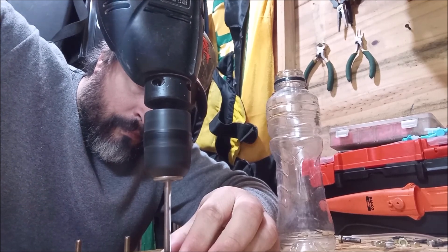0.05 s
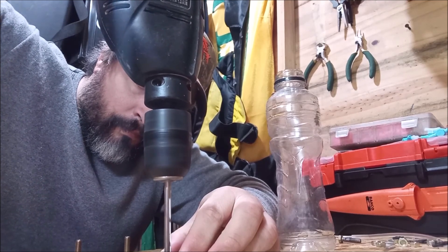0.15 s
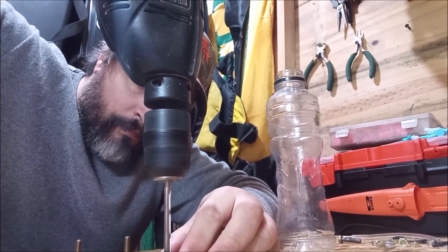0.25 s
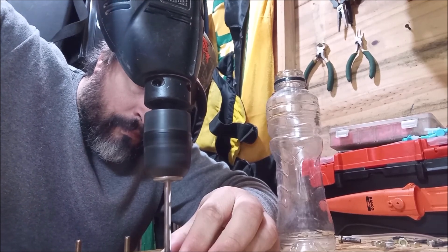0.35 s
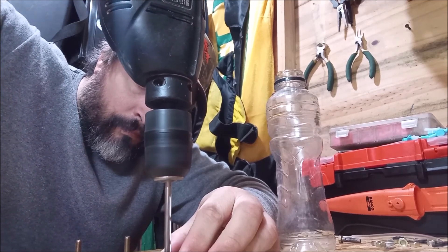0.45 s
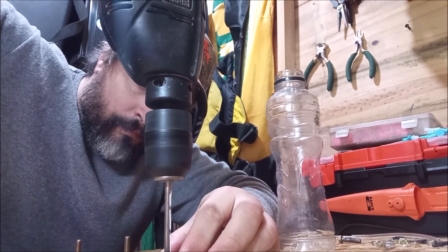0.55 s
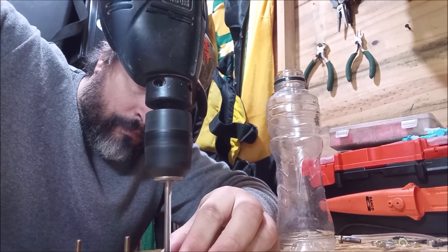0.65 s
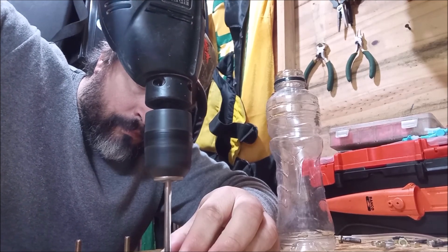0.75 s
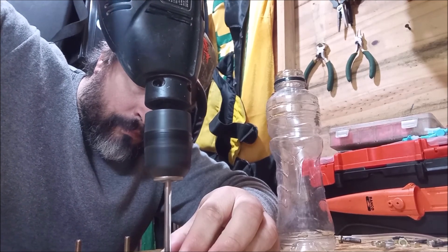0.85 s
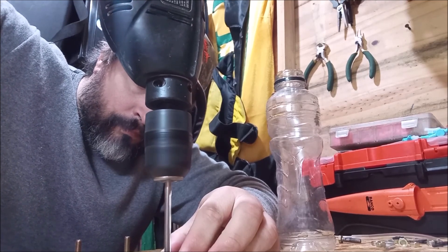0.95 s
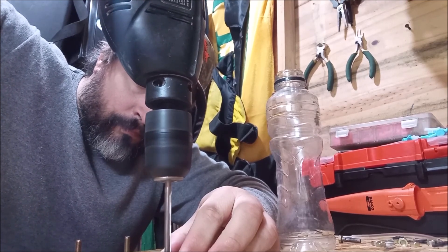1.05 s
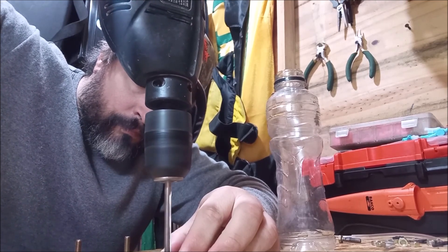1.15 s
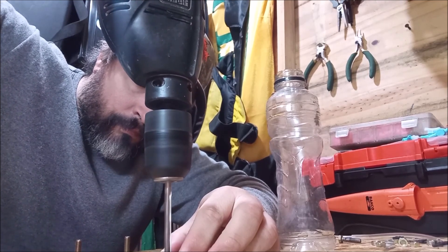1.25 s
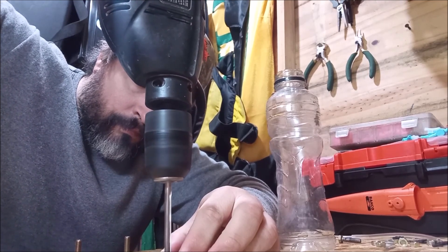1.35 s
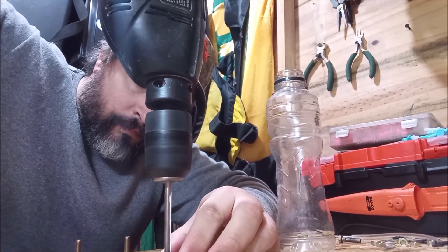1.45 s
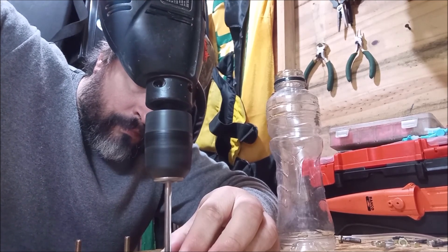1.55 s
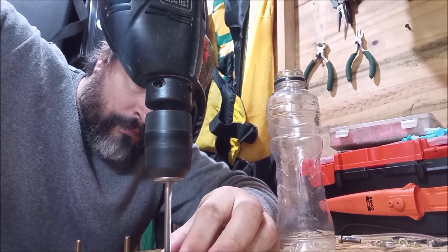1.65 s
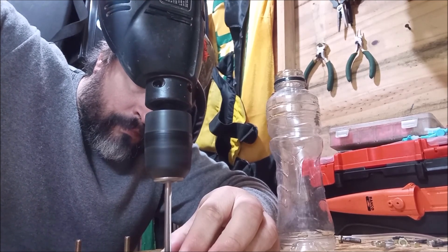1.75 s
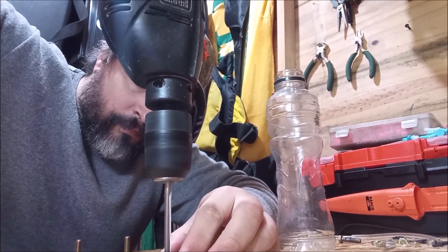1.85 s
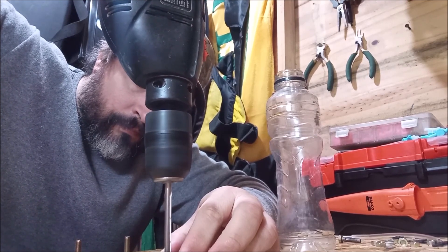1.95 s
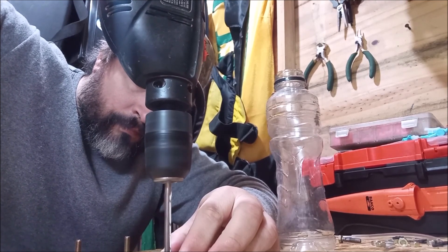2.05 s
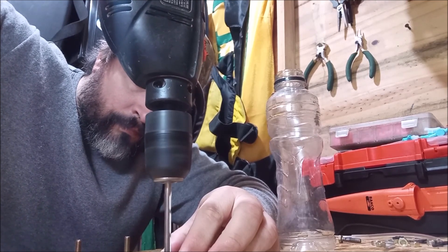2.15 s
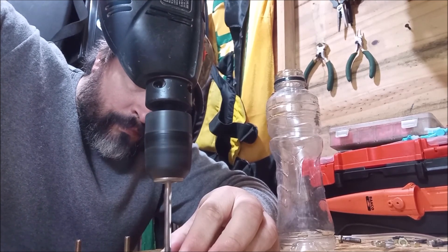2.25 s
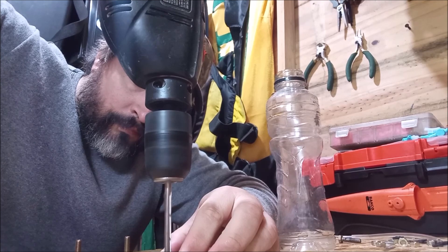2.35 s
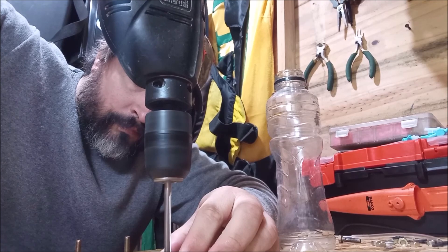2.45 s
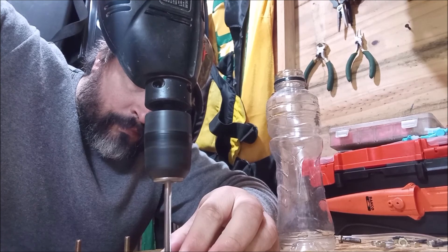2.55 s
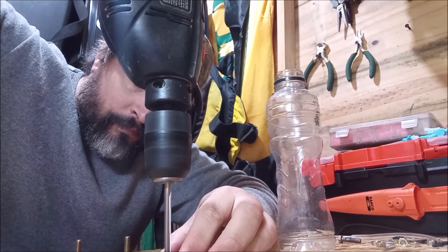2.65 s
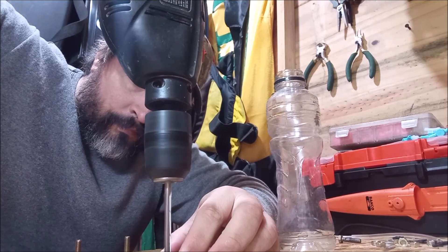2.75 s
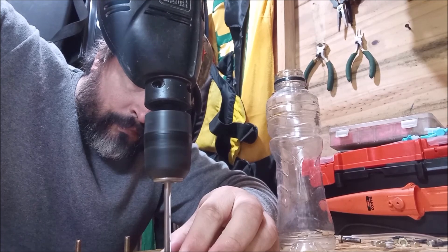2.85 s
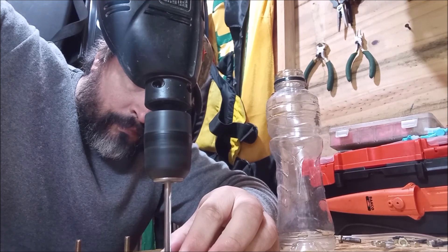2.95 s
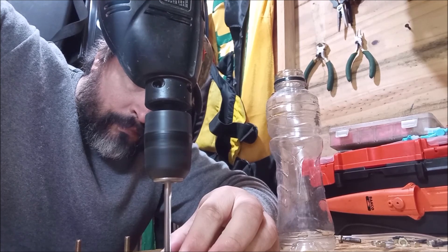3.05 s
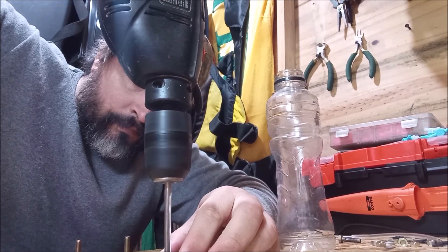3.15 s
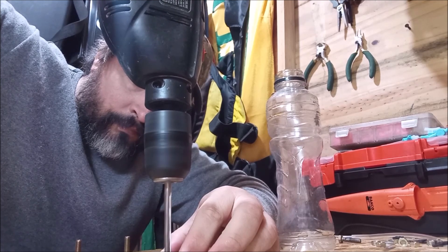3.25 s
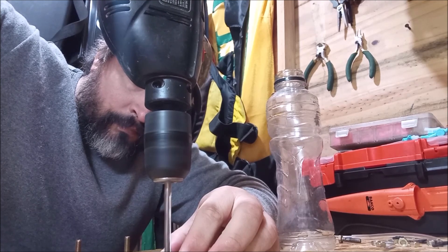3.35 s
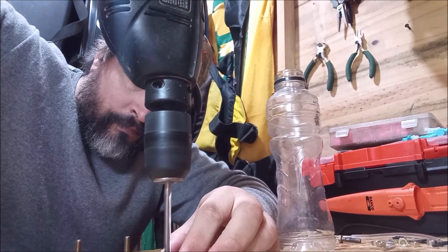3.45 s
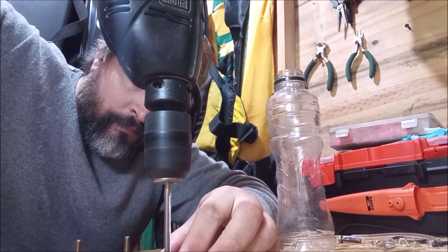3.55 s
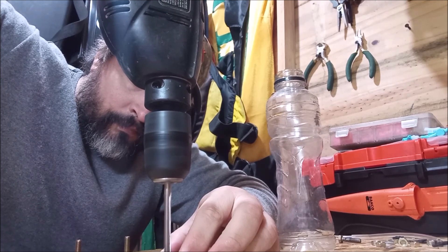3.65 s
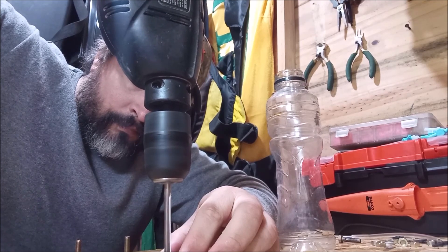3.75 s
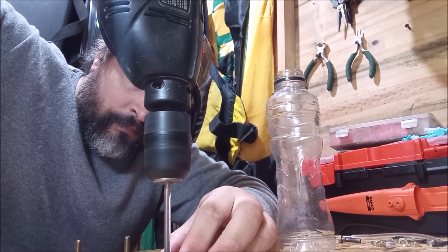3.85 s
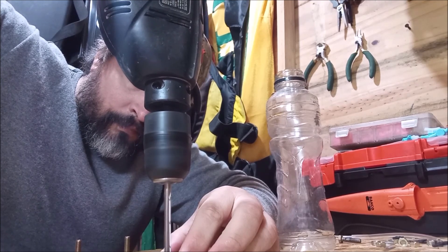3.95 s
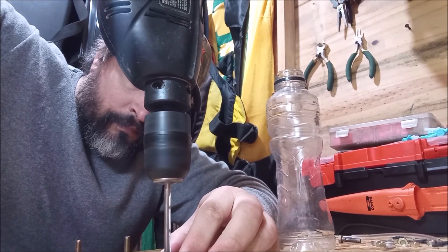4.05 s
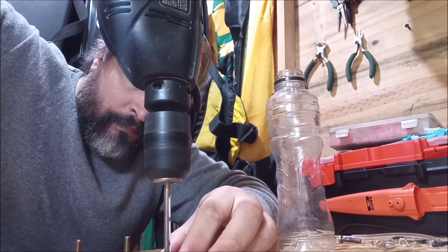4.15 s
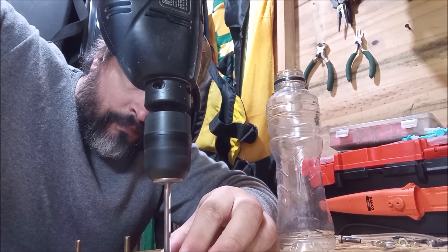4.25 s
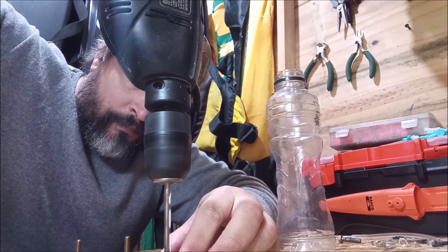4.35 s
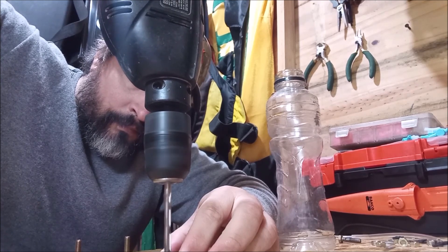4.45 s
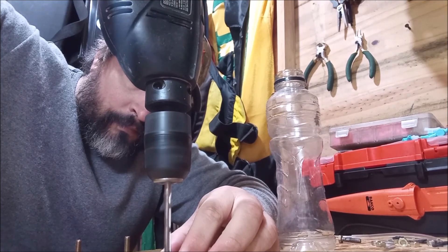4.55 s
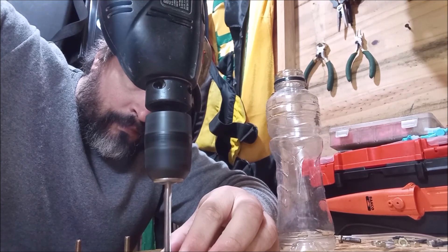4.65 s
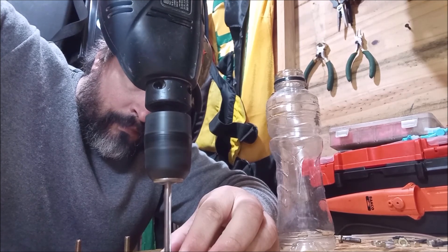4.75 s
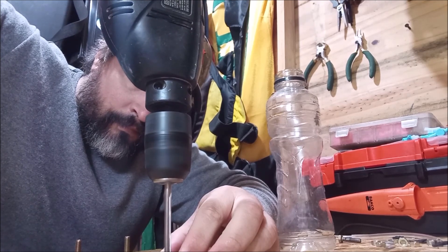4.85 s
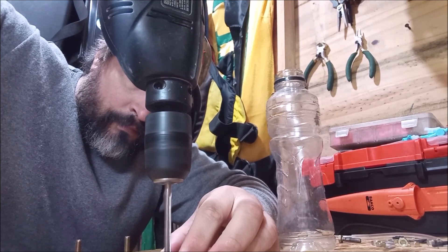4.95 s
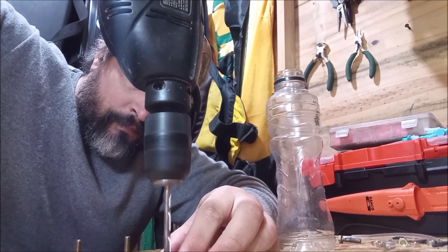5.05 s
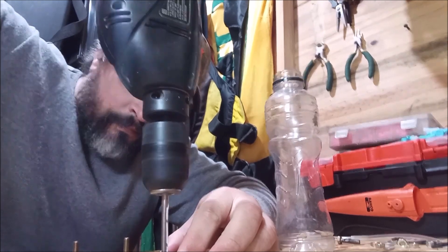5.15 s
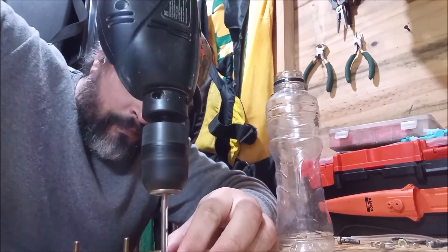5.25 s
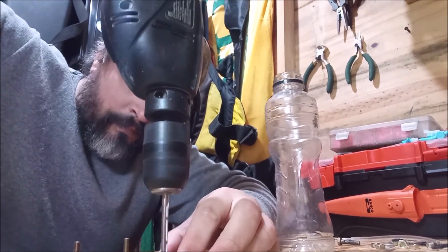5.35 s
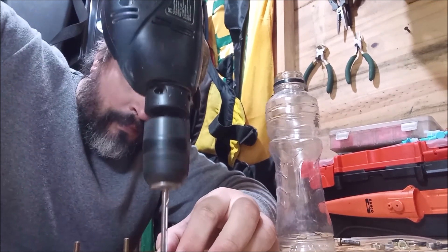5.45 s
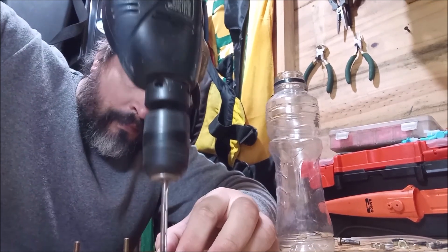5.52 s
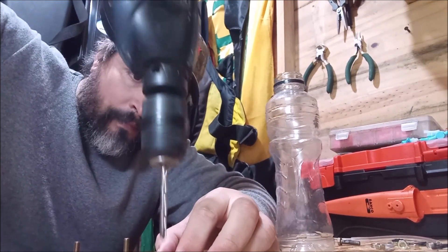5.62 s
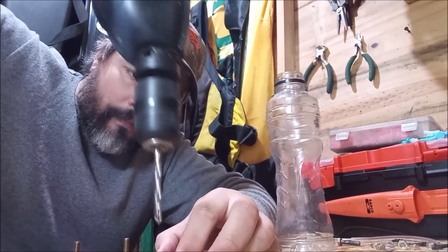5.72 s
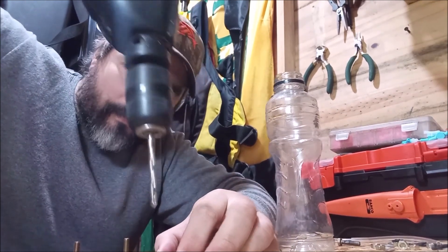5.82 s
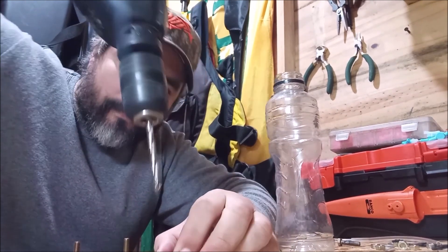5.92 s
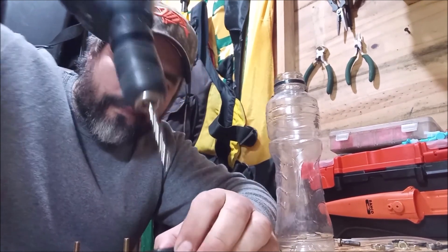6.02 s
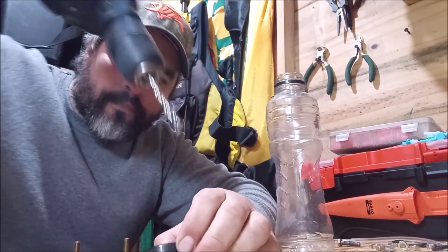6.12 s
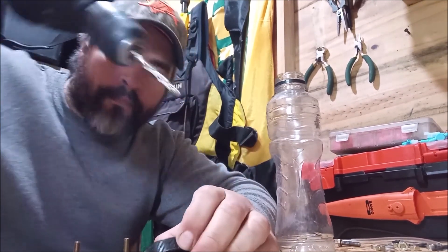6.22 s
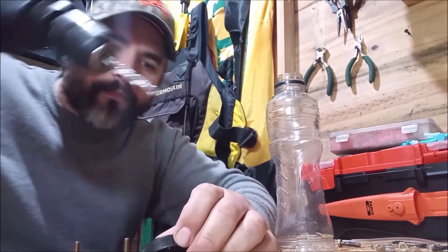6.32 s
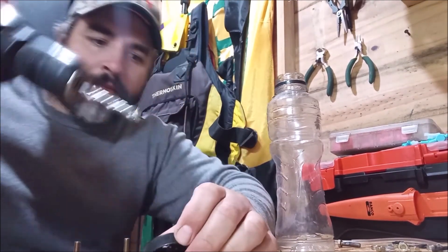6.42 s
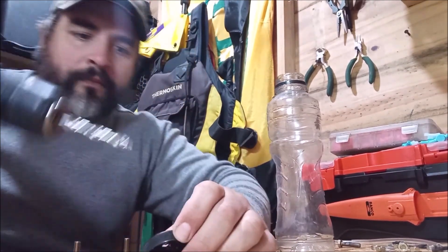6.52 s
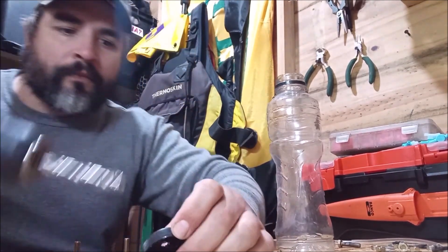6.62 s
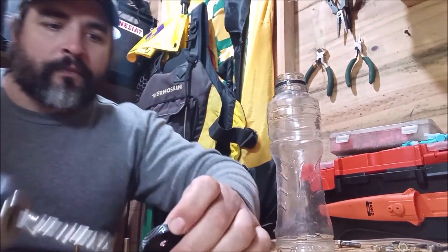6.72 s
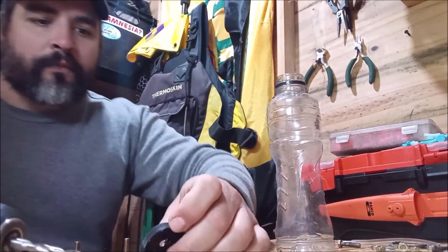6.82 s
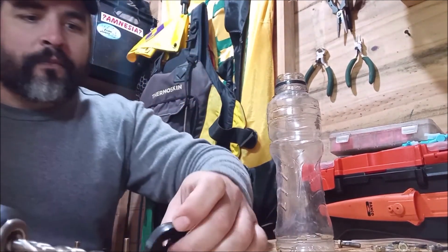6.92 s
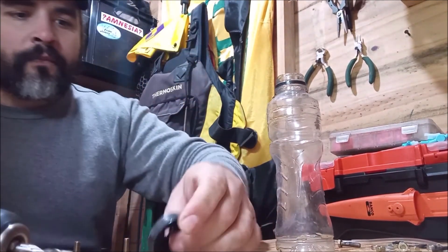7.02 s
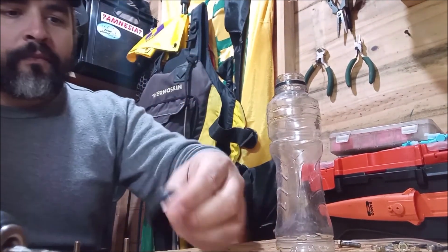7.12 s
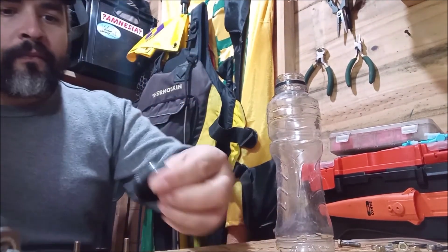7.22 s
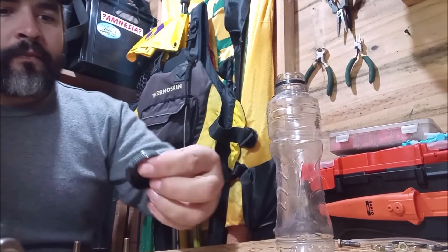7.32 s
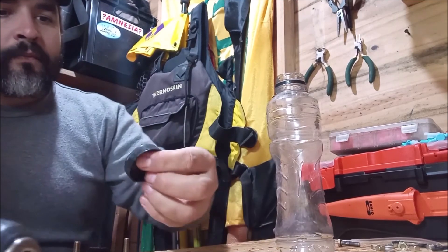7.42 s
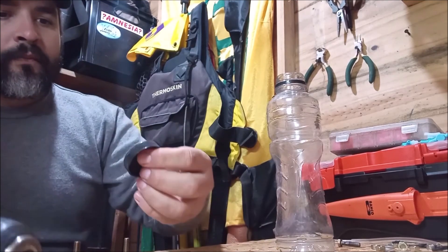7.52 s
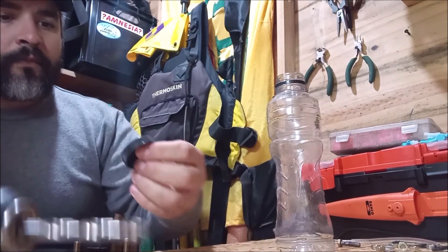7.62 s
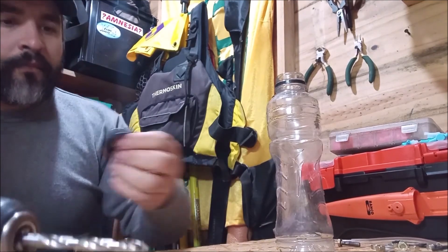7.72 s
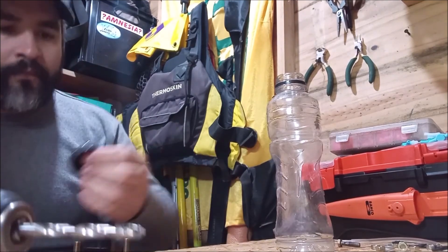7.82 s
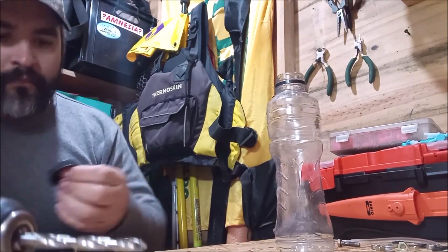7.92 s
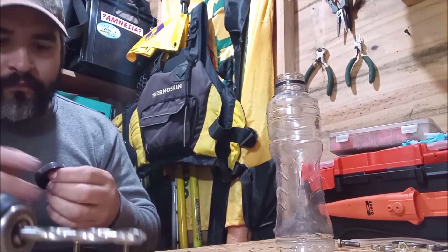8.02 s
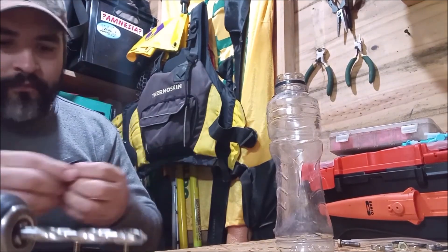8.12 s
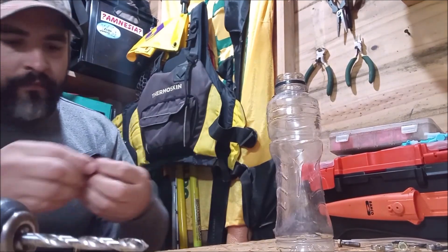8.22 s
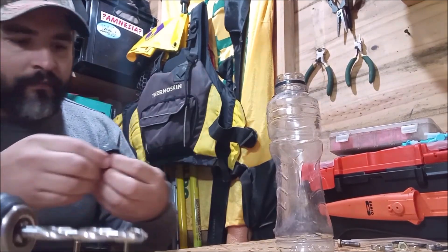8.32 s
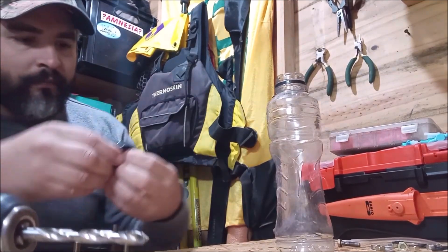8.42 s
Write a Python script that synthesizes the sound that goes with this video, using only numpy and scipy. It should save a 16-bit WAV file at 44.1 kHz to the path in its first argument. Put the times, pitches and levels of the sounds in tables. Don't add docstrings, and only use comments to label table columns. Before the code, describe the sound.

Very close in a small workshop, a corded drill bores a plastic cap with a gritty, gear-rattling whine that leaps up at each trigger pull and slowly sags. It breaks through with a double thump, shaking the bench, then coasts down as the cap scrapes briefly on wood. The motor stops and the drill lands in several hard knocks, with a faint steel clink.

```python
import sys
import numpy as np
from scipy import signal
from scipy.fft import rfft, irfft, next_fast_len
from scipy.io import wavfile
from scipy.ndimage import uniform_filter1d

SR = 44100
rng = np.random.default_rng(int(sys.argv[2]) if len(sys.argv) > 2 else 0)


def ratio_of_db(decibels):
    return 10 ** (np.asarray(decibels, float) / 20)


def unload_audio(sound):
    columns = np.transpose(np.atleast_2d(sound))
    steps = np.round(np.clip(columns, -1, 1) * 32767)
    wavfile.write(sys.argv[1], SR, steps.astype(np.int16))


N = 373953
T = np.arange(N) / SR
SLOW_T = T[::16]


def evened(x):
    return x / np.sqrt(np.mean(x ** 2) + 1e-20)


def read(points, hz):
    f, value = np.transpose(points)
    return np.interp(np.log(hz + 1), np.log(f + 1), value)


def shaped(x, gain):
    size = next_fast_len(len(x))
    hz = np.fft.rfftfreq(size, 1 / SR)
    return irfft(rfft(x, size) * gain(hz), size)[:len(x)]


def hump(hz, centre, width):
    return 1 / (1 + (2 * (hz - centre) / width) ** 2)


def drift(hz):
    return evened(shaped(rng.standard_normal(len(SLOW_T)), lambda f: 1 / (1 + (f / (16 * hz)) ** 4)))


def wander(hz):
    return np.interp(T, SLOW_T, drift(hz))


def add(mix, s, sound):
    part = mix[round(s * SR):][:len(sound)]
    part += sound[:len(part)]


def rings(modes, t, rise, stretch=1, tilt_db=0):
    hz, db, t60 = np.transpose(modes)[:, :, None]
    detune, spread, start = rng.standard_normal((3, len(modes), 1))
    decay_db = -60 * t / (t60 * abs(stretch))
    level = ratio_of_db(db + tilt_db * np.log2(hz / hz[0]) + 2 * spread + decay_db)
    ring = (level * np.sin(2 * np.pi * hz * (1 + .006 * detune) * t + start)).sum(0)
    ring = ring * np.sin(np.pi / 2 * np.minimum(t / rise, 1)) ** 2
    return ring / abs(ring).max()


# (frequency [Hz], level [dB per Hz])
ROOM_SPECTRUM = [(18, -44.5), (30, -11), (70, 3.5), (103, -7), (130, -6), (190, 0), (246, -30.5),
                 (351, -28.5), (477, -28), (2070, -40), (8540, -51.5), (11100, -68), (18800, -120)]


def room_tone():
    level = ratio_of_db(-71 + 2.0 * wander(10))
    return level * evened(shaped(rng.standard_normal(N), lambda f: ratio_of_db(read(ROOM_SPECTRUM, f))))


# (start [s], end [s], speed reached [turns per s], drag afterwards [per s])
TRIGGER_PULLS = [
    (.35, .7, 131.5, 0),
    (.73, .95, 259, .31),
    (2.385, 2.56, 173, .31),
    (2.92, 3.0, 141.3, .31),
    (3.0, 3.36, 209.5, .319),
    (4.6, 4.8, 181, .31),
    (4.8, 4.86, 183, .32),
    (5.12, 5.2, 145.5, .31),
    (6.6, 6.61, 48, .24),
]
START_TURNS, DRAG_PER_S = 147.3, .31
FRICTION_TURNS = 130


def armature():
    def coast(turns, drag, t):
        return (turns + FRICTION_TURNS) * np.exp(-drag * t) - FRICTION_TURNS

    speed = coast(START_TURNS, DRAG_PER_S, T)
    for start, end, reached, drag in TRIGGER_PULLS:
        left = (1 - np.clip((T - start) / (end - start), 0, 1)) ** 1.5
        held = np.interp(start, T, speed)
        pulled = held * left + reached * (1 - left)
        afterwards = coast(reached, drag, T - end)
        speed = np.where(T < start, speed, np.where(T < end, pulled, afterwards))
    return uniform_filter1d(np.maximum(speed, 5), size=900)


GEAR_RATIO = 7.4


def gear_rattle(turns):
    chuck = np.cos(2 * np.pi * turns / GEAR_RATIO)
    motor = np.cos(2 * np.pi * turns)
    rattle_db = 0.48 * chuck + 1.0 * motor + .35 * wander(8) + 1.1 * wander(470)
    return evened(ratio_of_db(rattle_db) * rng.standard_normal(N))


def worn_teeth(turns):
    order = np.arange(64)
    phase = np.exp(2j * np.pi * rng.random(len(order)))
    strength = rng.exponential(1, len(order)) ** .3 * (order >= 4)
    pattern = evened(irfft(phase * strength, 2048))
    return ratio_of_db(-15 + 2 * wander(30)) * np.interp(turns % 1, np.arange(2048) / 2048, pattern)


WHINE_MULTIPLES = [4, 8, 10, 14, 18, 18, 19, 20, 22, 23, 24, 25, 29, 29, 37, 41.25, 47, 47, 48, 48, 49, 53,
                   60, 60, 72, 96, 108]
# (level [dB], clearest speed [turns per s],
# loss an octave of speed away [dB], gain at full pull [dB])
WHINE_STRENGTHS = [(-25, 150, 6, 0), (-22, 150, 10, 0), (-24, 150, 8, 0), (-40, 152, 55, 38),
                   (-19.5, 133, 110, -10), (-20, 170, 20, -8), (-24, 130, 20, -5), (-22.5, 150, 8, 0),
                   (-22, 150, 12, -5), (-23, 135, 12, -5), (-16, 175, 30, -1), (-21, 145, 12, -8),
                   (-16.5, 131, 200, -12), (-19, 105, 25, -12), (-19, 155, 30, -8), (-23, 125, 10, -5),
                   (-13, 142, 220, -4), (-19, 92, 50, -8), (-9.5, 144, 200, -3), (-14, 98, 55, -8),
                   (-19, 145, 90, -5), (-24, 125, 12, 0), (-23, 120, 8, -3), (-17, 40, 14, 0),
                   (-18.5, 52, 12, 0), (-15.5, 54, 30, 0), (-13, 43, 40, 0)]
# (time [s], level [dB])
GEAR_LOAD = [(0, -4), (.62, -5), (.72, -2), (.76, 0), (2.3, 0), (2.46, 3), (2.55, 7), (2.63, 3), (2.8, 1),
             (2.93, -4), (3.1, -3), (3.34, 5), (3.45, -1), (3.75, 2), (4.2, 0), (4.35, -3), (4.7, -1),
             (5.2, 0), (5.42, 0), (5.5, -2), (5.7, 1)]
GEAR_TOP = 30


def whine(speed, turns, pull):
    out = np.zeros(N)
    slow_speed, slow_pull = speed[::16], pull[::16]
    load_db = np.interp(SLOW_T, *np.transpose(GEAR_LOAD))
    for multiple, (db, best, fade_db, pull_db) in zip(WHINE_MULTIPLES, WHINE_STRENGTHS):
        waver_hz = 8 + .5 * multiple
        waver = .88 + .37 * (drift(waver_hz) + 1j * drift(waver_hz))
        level_db = db - fade_db * np.log2(slow_speed / best) ** 2 + pull_db * slow_pull
        level_db = level_db + 1.7 * drift(10) + load_db * (multiple < GEAR_TOP)
        level = ratio_of_db(level_db) * (multiple * slow_speed < 12000)
        note = np.interp(T, SLOW_T, level * waver) * np.exp(2j * np.pi * multiple * turns)
        out = out + note.real
    return out


def imbalance(speed, turns, pressure_db):
    bench = ratio_of_db(-11) * (speed / 150) ** 3.7
    for hz, db, t60 in BENCH_MODES[2:4]:
        bench = bench + ratio_of_db(db) * hump(speed, hz, 32)
    lift_s, lift_over_s = 6.15, 0.12
    hum = ratio_of_db(-49.5 + pressure_db + 3.1 * wander(9.7)) * bench * np.sin(2 * np.pi * turns)
    return hum * np.clip((lift_s - T) / lift_over_s, 0, 1)


# (frequency [Hz], level [dB per Hz])
DRILL_COLOUR = [(24, -68.5), (40, -20.5), (134, -2.5), (315, -16.5), (632, -10.5), (723, -9.5),
                (1450, -6.5), (1820, -7.5), (2320, -5), (2660, -10), (3720, -9.5), (4070, -15.5),
                (6820, -16.5), (7460, -22.5), (8540, -51), (11100, -76), (18800, -120)]
# (frequency [Hz], width [Hz], height above the colour [dB])
HOUSING_MODES = [(139.8, 28, 8.5), (228, 77, 6.5), (485, 86, 7.5), (637.5, 46, 12), (778, 21, 3.5),
                 (926, 160, 7), (1172, 95, 6.5), (1460, 51, 6.5), (2228, 62, 6), (2327, 80, 7),
                 (2382, 60, 3.5), (2506, 93, 8.5), (2871, 210, 8), (3132, 110, 6), (3400, 80, -3.5),
                 (3550, 130, 2), (3820, 89, 5.5), (4610, 700, 4.5), (6700, 110, -1)]


def housing(hz):
    humps_db = sum(db * hump(hz, f, width) for f, width, db in HOUSING_MODES)
    return ratio_of_db(read(DRILL_COLOUR, hz) + humps_db)


# (time [s], housing level [dB], pressure of the bit on the cap [dB])
DRILL_EFFORT = [(0, -35, -4.5), (.35, -36.5, -2.5), (.55, -36.5, -1), (0.719, -37, 3.5), (0.798, -35, -1),
                (1.2, -35.5, -2), (1.601, -36, 0.5), (2.1, -36.5, 5.5), (2.45, -36, 0), (2.95, -35.5, 3),
                (3.04, -37, 5), (3.15, -35, 1.5), (3.3, -34, -4.5), (4.1, -36, 1.5), (4.57, -37.5, 4),
                (4.65, -34, -5.5), (5.12, -35, -1.5), (5.3, -37.5, -1.5), (5.6, -39.5, 3), (5.95, -41, 4.5),
                (6.5, -45, 10), (6.68, -45, 17), (6.82, -47.5, 9), (7.05, -48.5, 15.5)]
# (level over the housing [dB],
# gain per octave of speed [dB], share of pressure [0-1], gain at full pull [dB], flutter [dB])
DRILL_LAYERS = [
    (-13, 3.5, 0.64, 2.5, 2.5),
    (-1, 8, 0.13, 0, 1.15),
    (-2, 2, 0.01, 2.5, -1.5),
    (-2, 6.5, 0.23, 0.7, -0.04),
]
LAYER_EDGES_HZ = [0, 330, 1800, 3500, SR]
SWUNG_AWAY = [-1, 4.5, -4.5, 3.5]
AWAY_S, AWAY_OVER_S = 6.47, 0.52
DIP_S, DIP_DB, DIP_BACK_S = 5.16, -7, .05
STOP_S, STOP_DB_PER_S = 7.01, -71


def drill():
    speed = armature()
    turns = np.cumsum(speed * (1 + .0015 * wander(20))) / SR
    speeding_up = uniform_filter1d(np.gradient(speed), size=2000) * SR
    pull = np.clip(speeding_up / 700, 0, 1) ** 2
    drive = gear_rattle(turns) + worn_teeth(turns) + whine(speed, turns, pull)

    s, housing_db, pressure_db = np.transpose(DRILL_EFFORT)
    pressure_db = np.interp(T, s, pressure_db)
    since = T - DIP_S
    housing_db = np.interp(T, s, housing_db)
    housing_db = housing_db + DIP_DB * np.exp(-abs(since) / DIP_BACK_S) * (since > 0)
    housing_db = housing_db + STOP_DB_PER_S * np.maximum(T - STOP_S, 0)
    away = np.clip((T - AWAY_S) / AWAY_OVER_S, 0, 1)

    def below(f, edge):
        return 1 / (1 + (f / (edge + 1e-9)) ** 8)

    out = imbalance(speed, turns, pressure_db)
    for k, (db, octave_db, share, pull_db, flutter_db) in enumerate(DRILL_LAYERS):
        low, high = LAYER_EDGES_HZ[k:k + 2]
        band = shaped(drive, lambda f: housing(f) * (below(f, high) - below(f, low)))
        level_db = housing_db + db + octave_db * np.log2(speed / 150) + share * pressure_db
        level_db = level_db + pull_db * pull ** .5 + flutter_db * wander(22) + SWUNG_AWAY[k] * away
        out = out + evened(band) * ratio_of_db(level_db)
    return out * np.clip((STOP_S + 0.36 - T) / .03, 0, 1)


# (time [s], peak level [dB], ring length [factor], brightness [dB per octave])
BENCH_BLOWS = [(5.14, -25.5, 0.97, -6), (5.16, -15.5, 0.45, 2.5), (5.179, -16, 0.78, -0.5),
               (5.209, -29, 0.69, 10), (5.234, -30.5, .6, 3.5), (5.277, -25, 0.53, 5.5),
               (5.296, -21.5, 0.66, -5.5), (5.377, -27.5, 0.92, 0), (5.571, -26, 0.65, 9.5),
               (7.083, -26.5, 0.34, -2), (7.089, -26.5, 0.64, 1.5), (7.099, -22, 0.43, -8),
               (7.285, -22, 0.9, -1.3), (7.311, -23.5, 0.43, 0), (7.383, -16, 0.7, 2),
               (7.391, -18.5, 0.72, 0), (7.504, -37.5, 0.43, 17), (7.58, -49, .8, 3), (7.597, -53, 1, 10),
               (7.685, -40, 0.8, 4), (7.708, -31.5, 1, 21), (7.729, -23, 0.35, -19),
               (7.744, -27.5, 0.55, 4.5), (7.761, -25.5, 0.34, -8), (7.838, -25, 0.72, 3),
               (7.848, -18, 0.38, -4), (7.888, -33, 0.84, -13), (8.0, -66, .9, 9), (8.125, -67, 0.86, 1)]
# (frequency [Hz], level [dB], time to die by 60 dB [s])
BENCH_MODES = [(74, 0.5, 0.16), (109, 1, 0.12), (139.4, 3, 0.38), (202, -1, 0.15), (272, -4.5, 0.075),
               (374, 1, 0.058), (417, -0.5, 0.11), (483.5, -5.5, 0.16), (654, -11, 0.23), (746, -10, 0.074),
               (940, -33.5, 0.24)]


def thuds():
    out, t = np.zeros(N), np.arange(SR // 2) / SR
    for s, db, stretch, tilt_db in BENCH_BLOWS:
        add(out, s, ratio_of_db(db) * rings(BENCH_MODES, t, 0.0023, stretch, tilt_db))
    return out


# (time [s], rattle level [dB], rumble level [dB], rattle length [s])
SHAKES = [
    (5.18, -37, -26, 0.46),
    (5.563, -58, -46, 0.053),
    (5.672, -68, -53, .05),
    (5.85, -65, -44.5, .05),
    (7.115, -51.5, -43.5, 0.51),
    (7.299, -48, -59, 0.076),
    (7.376, -40.5, -37, 0.14),
    (7.691, -43.5, -37.5, 0.16),
    (7.829, -58.5, -44.5, 0.14),
]
# (frequency [Hz], level [dB per Hz])
LOOSE_COLOUR = [(150, -34.5), (250, -0.5), (576, -8.5), (744, -8.5), (1300, -24.5), (1690, -75.5),
                (2860, -120)]


def shake():
    lumps = rng.standard_normal((2, N)) * ratio_of_db(1.6 * wander(70))
    rattle = shaped(lumps[0], lambda f: ratio_of_db(read(LOOSE_COLOUR, f)))
    rumble = shaped(lumps[1], lambda f: sum(ratio_of_db(db) * hump(f, hz, 28) for hz, db, t60 in BENCH_MODES[:4]))
    rattle_level, rumble_level = np.zeros(N), np.zeros(N)
    t = np.arange(SR) / SR
    rise = np.minimum(t / 0.041, 1)
    rattle_t60, rumble_t60 = 1, 0.83
    for s, rattle_db, rumble_db, length in SHAKES:
        rattle_fade = ratio_of_db(rattle_db - 60 * t / rattle_t60) / (1 + (t / length) ** 14)
        add(rattle_level, s, rise * rattle_fade)
        add(rumble_level, s, rise * ratio_of_db(rumble_db - 60 * t / rumble_t60))
    return evened(rattle) * rattle_level + evened(rumble) * rumble_level


# (time [s], level [dB])
SCRAPE_LEVEL = [(6.3, -55), (6.42, -54), (6.48, -41), (6.54, -48), (6.6, -52), (6.72, -60), (7.0, -64),
                (7.25, -72)]
# (frequency [Hz], width [Hz], level [dB])
CAP_MODES = [(1070, 140, 0.5), (1500, 120, 4.5), (1620, 90, 2.5), (1300, 300, -1.5)]


def scrape():
    grit = rng.standard_normal(N) * ratio_of_db(1.0 * wander(60))
    hollow = shaped(grit, lambda f: sum(ratio_of_db(db) * hump(f, hz, width) for hz, width, db in CAP_MODES))
    return evened(hollow) * ratio_of_db(np.interp(T, *np.transpose(SCRAPE_LEVEL), left=-120, right=-120))


# (time [s], peak level [dB], treble level [dB],
# time to die by 60 dB [s], scattered tail level [dB])
SHELL_KNOCKS = [(7.083, -40, -1.5, 0.066, -10.5), (7.131, -52, 5, 0.076, -24), (7.173, -41, -0.5, 0.1, -14),
                (7.2873, -22, -15.5, 0.066, -21.5), (7.2963, -50, -22.5, 0.03, -26),
                (7.3088, -22, -37, 0.037, -34), (7.3816, -31.5, -7, 0.076, -17.5),
                (7.3906, -29.5, -25.5, 0.032, -14.5), (7.5048, -44, -8, 0.05, -17),
                (7.691, -64, 4, 0.065, -24), (7.702, -40, -14, 0.045, -20), (7.7089, -27, -16, 0.083, -29),
                (7.7185, -51, -20, 0.068, -22), (7.745, -32, -11, 0.06, -25),
                (7.7543, -34.5, -3, 0.078, -22.5), (7.7644, -55, -4, 0.06, -22),
                (7.8353, -24.5, -18, 0.085, -39), (7.85, -36.5, 5, 0.028, -38),
                (8.138, -66, -1, 0.083, -17), (8.4683, -72, 1, 0.06, -22)]
# (frequency [Hz], level [dB per Hz])
SHELL_COLOUR = [(500, -18.5), (900, -4), (1400, -1.5), (1660, 1), (1950, -4.5), (2270, 2), (2700, -5),
                (3150, -3.5), (3500, -12), (5000, -49)]
# (frequency [Hz], level [dB per Hz])
SHELL_TREBLE = [(2060, -37), (3500, -3.5), (4190, 4.5), (4820, -1.5), (6680, -7), (7640, -22), (8540, -56),
                (11100, -76), (18800, -120)]


def cracks():
    out, t = np.zeros(N), np.arange(SR // 3) / SR
    for s, db, treble_db, t60, scatter_db in SHELL_KNOCKS:
        low, high = rng.standard_normal((2, len(t)))
        noise = evened(shaped(low, lambda f: ratio_of_db(read(SHELL_COLOUR, f))))
        treble = evened(shaped(high, lambda f: ratio_of_db(read(SHELL_TREBLE, f))))
        noise = noise + ratio_of_db(treble_db) * treble
        tail = ratio_of_db(scatter_db - 60 * t / 0.9) / (1 + (t / 0.16) ** 6)
        fade = ratio_of_db(-60 * t / abs(t60)) + tail
        add(out, s, ratio_of_db(db - 14.0) * noise * fade * np.minimum(t / 0.00064, 1))
    return out


# (time [s], peak level [dB], frequency [Hz], time to die by 60
# dB [s])
STRUCK_NOTES = [(7.083, -32.5, 516, 0.018), (7.2869, -23.5, 420, 0.035), (7.381, -14, 395, .022),
                (7.385, -26, 140.4, 0.27), (7.59, -69, 2320, 0.14), (7.597, -68, 2514, .22),
                (7.79, -58, 936, 0.22), (7.871, -60, 930, 0.22), (8.115, -77, 930, 0.24),
                (8.138, -76, 3300, 0.091), (8.14, -79, 2750, 0.091), (8.138, -79, 2350, .08)]


def tings():
    out, t = np.zeros(N), np.arange(SR // 4) / SR
    for s, db, hz, t60 in STRUCK_NOTES:
        rise = np.minimum(t / (.03 * abs(t60)), 1)
        add(out, s, ratio_of_db(db - 60 * t / abs(t60)) * -np.sin(2 * np.pi * hz * t) * rise)
    return out


# (time [s], peak level [dB], low ring level [dB])
STEEL_BOUNCES = [(7.584, -61, -7), (7.596, -60, -3), (7.754, -51, -1), (7.797, -62, -2), (7.873, -68, 7),
                 (7.898, -54.5, -22), (7.9114, -70, -25), (7.976, -61.5, -9), (8.0393, -68.5, -21.5)]
# (frequency [Hz], level [dB], time to die by 60 dB [s])
STEEL_MODES = [(2320, -14, .12), (2514, -13, 0.22), (2912, -25, .12), (3560, -11, .08), (3720, 4, .1),
               (3970, -5, .07), (4100, -4, 0.13), (4200, -8, .2), (4823, -15, .16), (5550, -11, .11),
               (6050, -16, .12)]
# (frequency [Hz], level [dB], time to die by 60 dB [s])
STEEL_LOW_MODES = [(1660, 6, 0.31), (1685, -2, 0.18), (1850, -15, .6)]


def clinks():
    out, t = np.zeros(N), np.arange(SR // 2) / SR
    for s, db, low_db in STEEL_BOUNCES:
        bright = rings(STEEL_MODES, t, 0.0012)
        low = ratio_of_db(low_db) * rings(STEEL_LOW_MODES, t, .006)
        add(out, s, ratio_of_db(db) * (bright + low))
    return out * ratio_of_db(2.5 * wander(60))


def scene():
    mix = drill() + scrape() + thuds() + shake()
    mix = mix + cracks() + clinks() + tings() + room_tone()
    return mix[None]


# (time [s], share of tones kept [0-1], level left of the others [dB],
# softness of the edges [0-1], highest kept frequency [Hz])
THIN_MOMENTS = [(.74, .35, -14, .9, 8000), (1.262, .19, -45, .6, 6900), (1.849, .28, -19, .85, 8000),
                (1.913, .24, -24, .78, 8000), (2.146, .24, -24, .78, 8000), (2.469, .28, -19, .85, 8000),
                (2.551, .28, -19, .85, 8000), (2.936, .25, -22, .8, 8000), (3.0, .28, -19, .85, 8000),
                (3.087, .28, -19, .85, 8000), (3.171, .28, -19, .85, 8000), (3.493, .28, -19, .85, 8000),
                (3.683, .3, -12, 1, 8000), (3.865, .18, -50, .66, 4900), (4.003, .3, -13, 1, 8000),
                (4.6, .25, -18, .9, 8000), (4.881, .25, -20, 1, 7000), (5.175, .26, -45, .9, 4900),
                (6.05, .25, -22, .88, 6300), (6.116, .28, -20, .9, 7000), (6.264, .3, -16, .9, 8000),
                (6.734, .25, -18, .9, 8000), (6.991, .3, -16, .9, 8000)]


def thinned(x):
    out, size = x.copy(), 2048
    for s, kept, rest_db, soft, top_hz in THIN_MOMENTS:
        window = signal.windows.tukey(size, soft)
        at = slice(round(s * SR) - size // 2, round(s * SR) + size // 2)
        lines = rfft(window * x[at])
        nearby = uniform_filter1d(abs(lines), size=120)
        standing = uniform_filter1d(abs(lines), size=2) / nearby ** .8
        top = round(top_hz * size / SR)
        bar = np.quantile(standing[:top], 1 - np.clip(kept, .01, .9))
        standing[top:] = 0
        standing[:12] = np.inf
        change = np.where(standing > bar, 1, ratio_of_db(rest_db)) - 1
        out[at] += window * irfft(lines * change, size)
    return out


def roll_off(x):
    return signal.sosfilt(signal.butter(12, 8690, fs=SR, output="sos"), x)


def record(dry):
    limited = shaped(dry[0], lambda f: 1 / (1 + (f / 8500) ** 60) * f ** 3 / (f ** 3 + 45. ** 3))
    return roll_off(thinned(limited)[None])


dry = scene()
out = record(dry)
unload_audio(out)
```